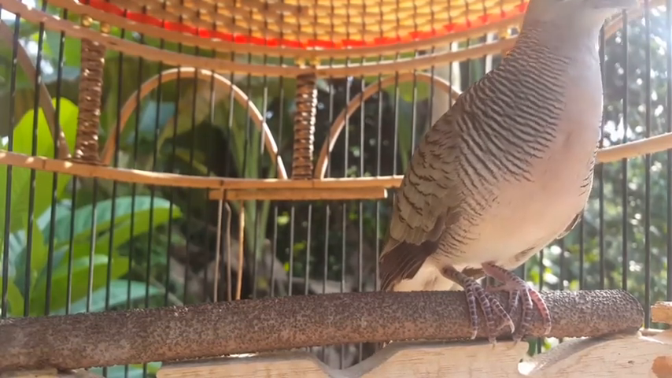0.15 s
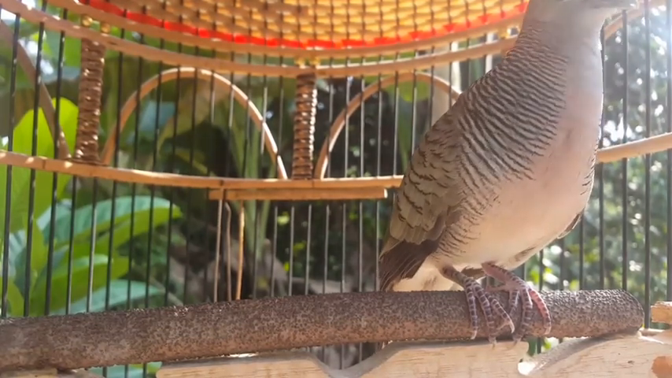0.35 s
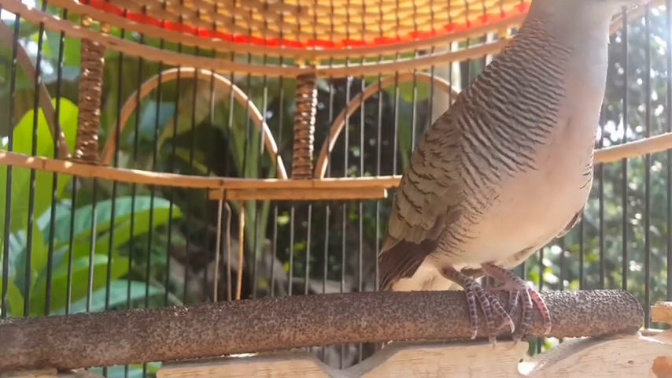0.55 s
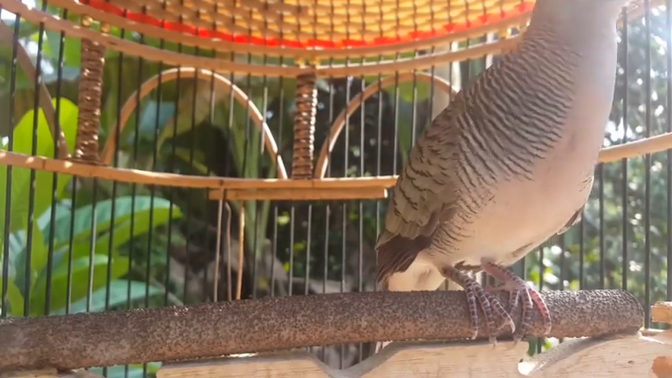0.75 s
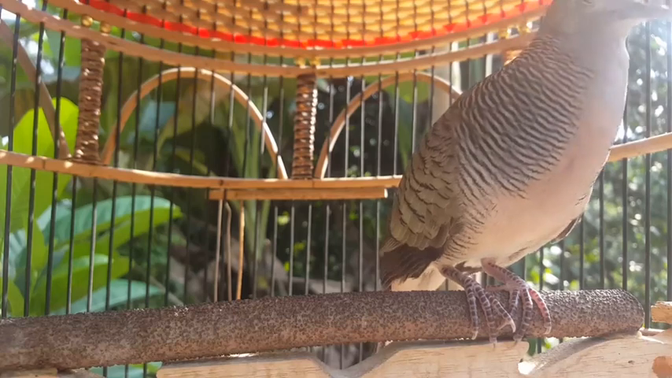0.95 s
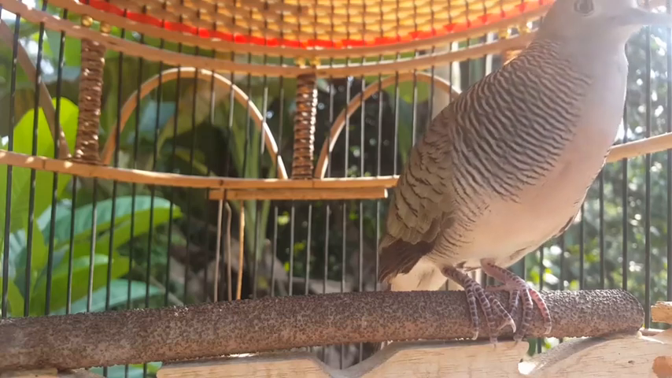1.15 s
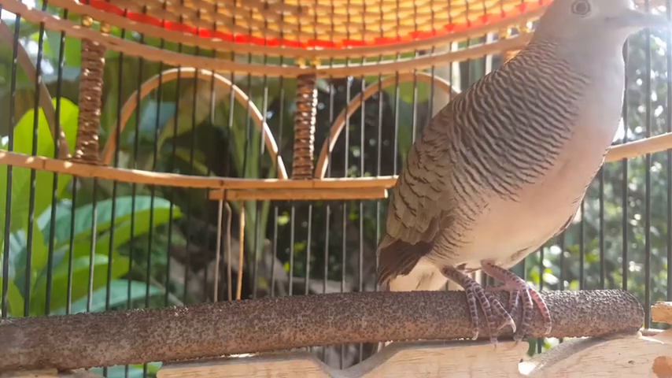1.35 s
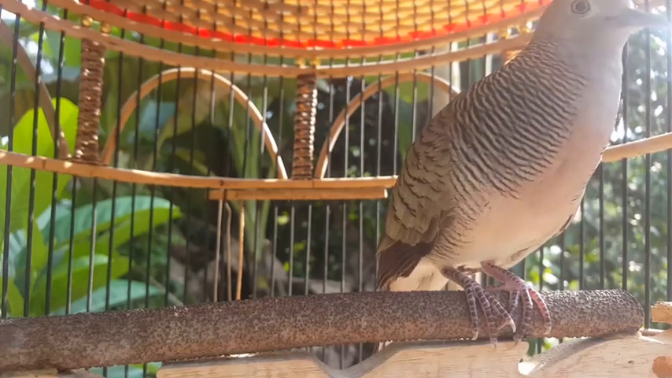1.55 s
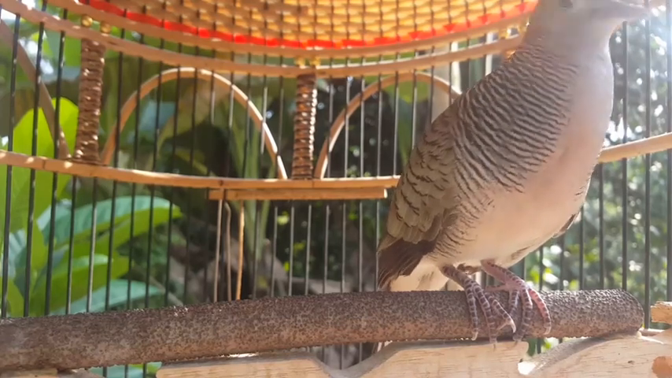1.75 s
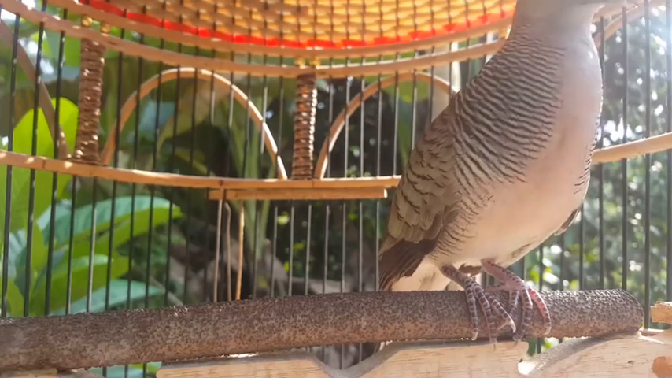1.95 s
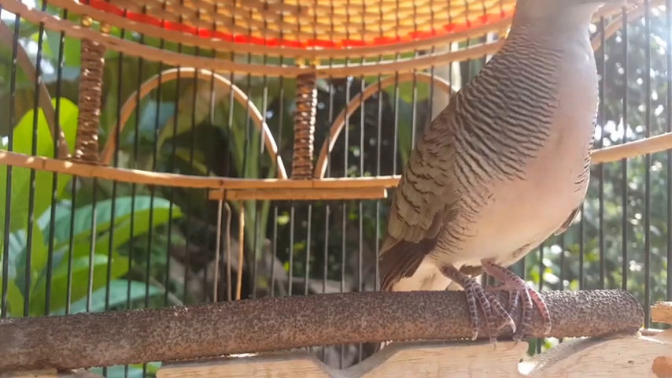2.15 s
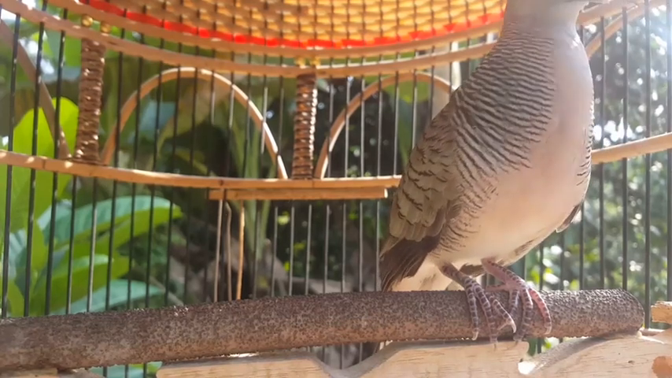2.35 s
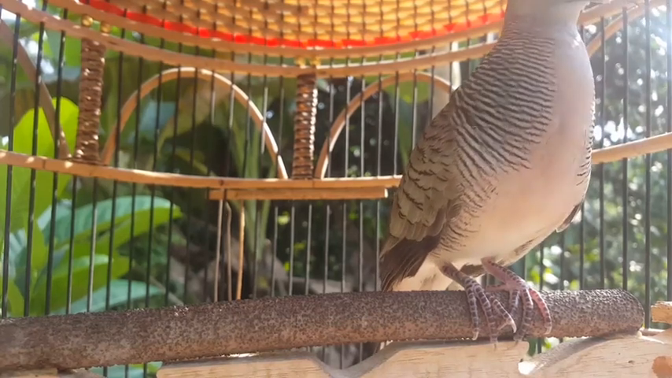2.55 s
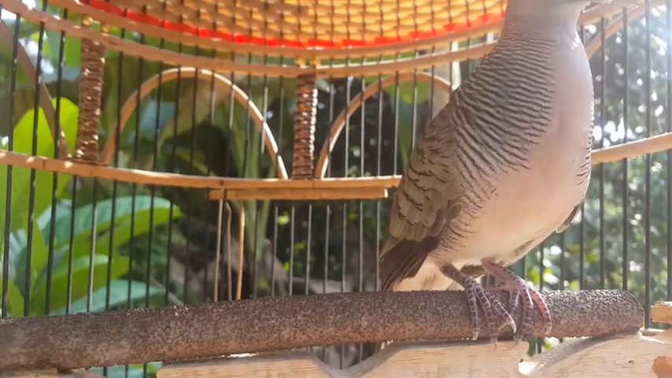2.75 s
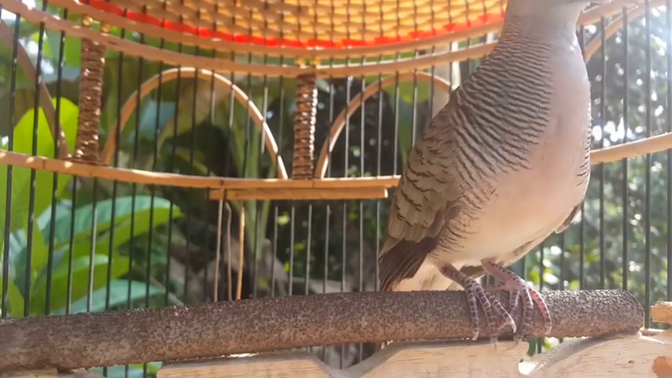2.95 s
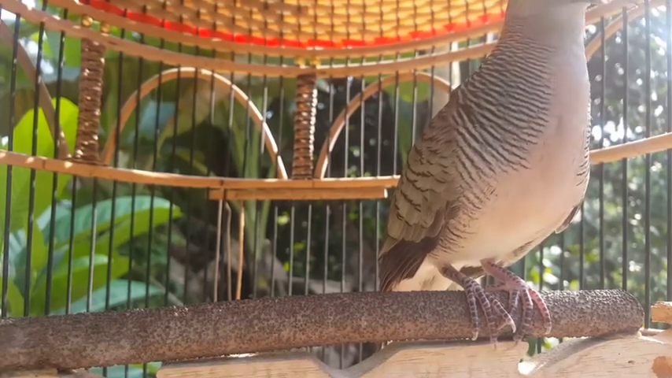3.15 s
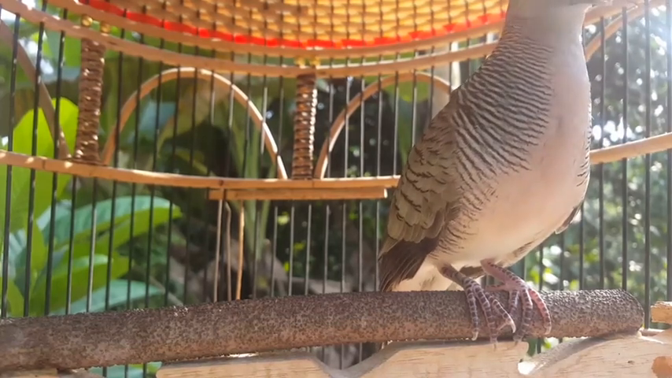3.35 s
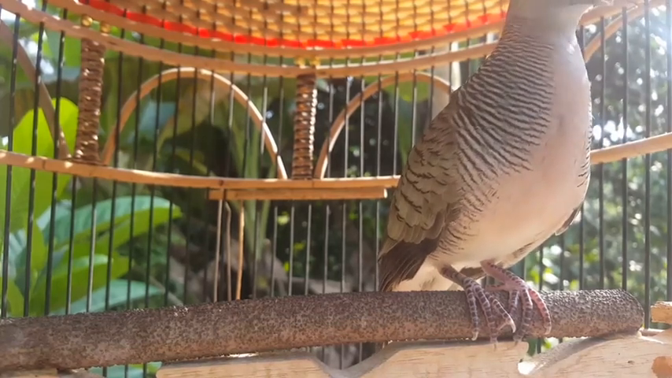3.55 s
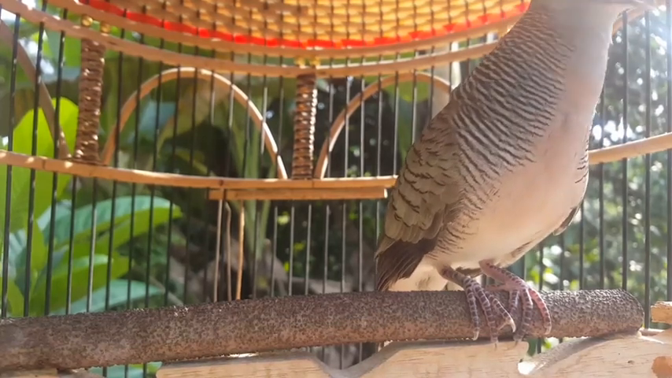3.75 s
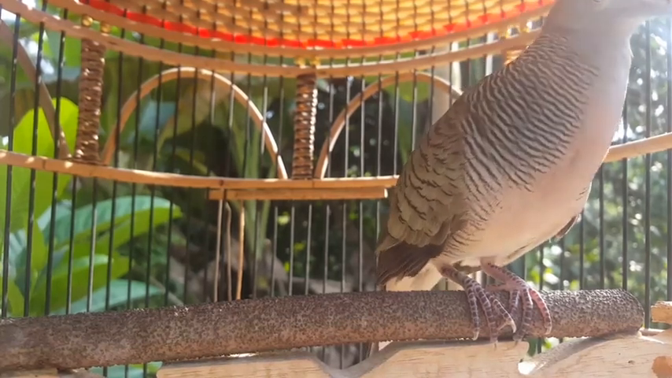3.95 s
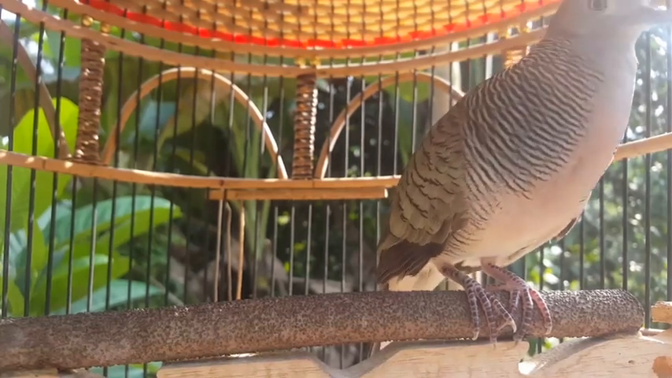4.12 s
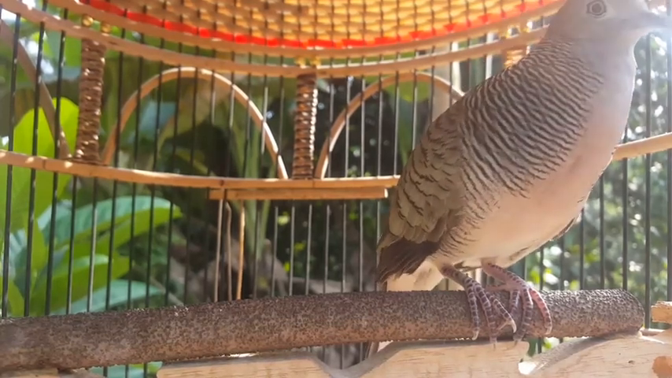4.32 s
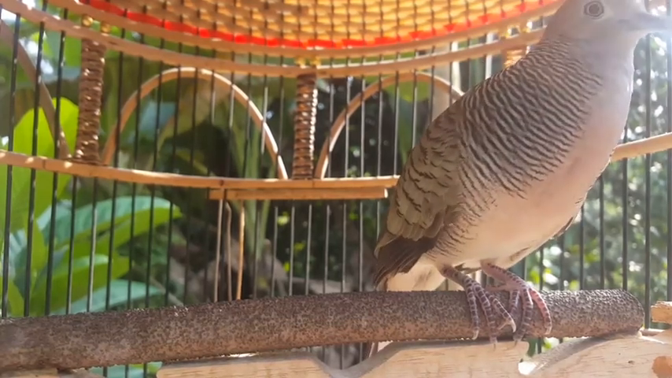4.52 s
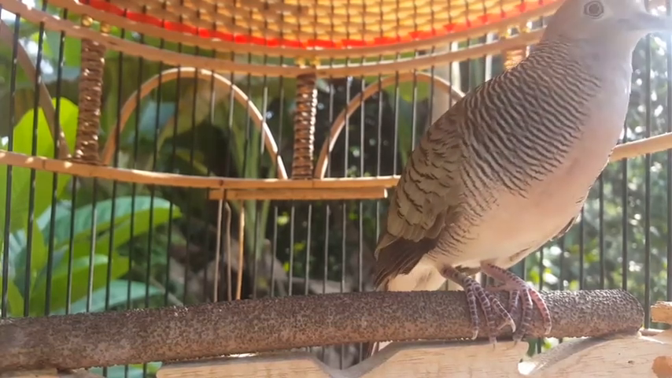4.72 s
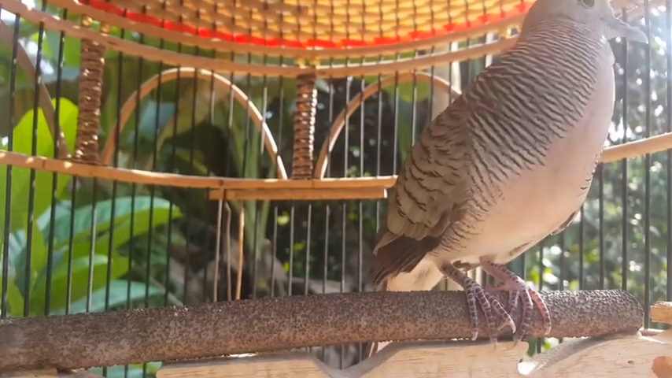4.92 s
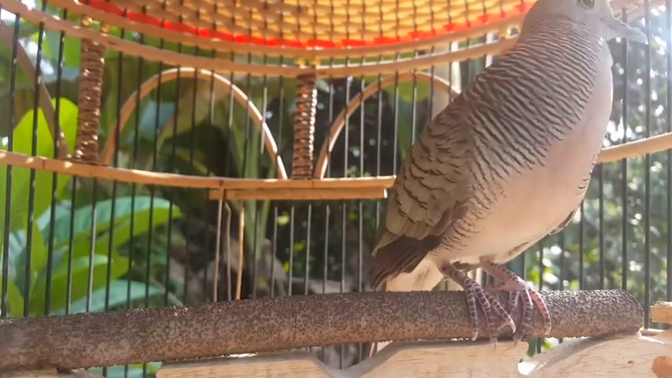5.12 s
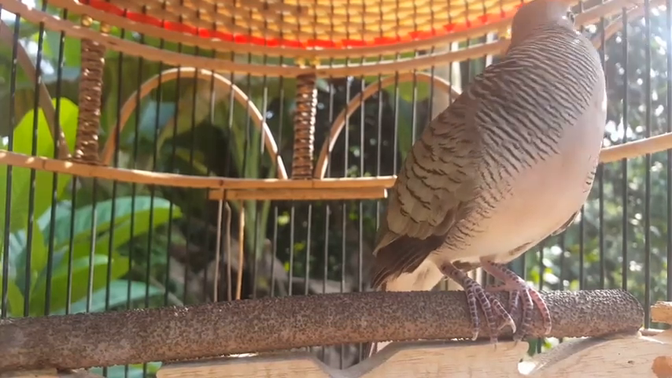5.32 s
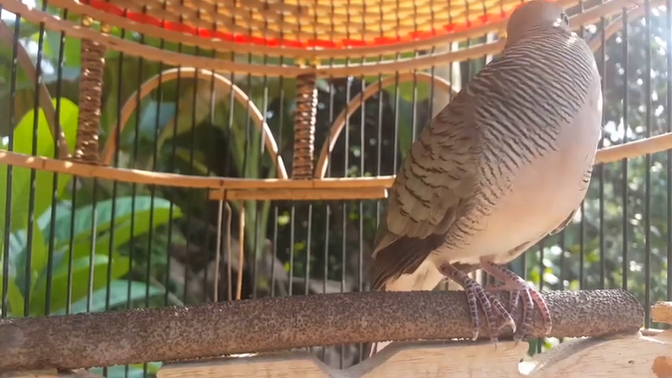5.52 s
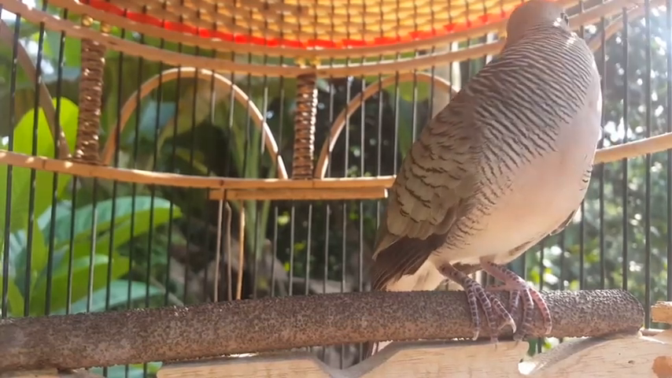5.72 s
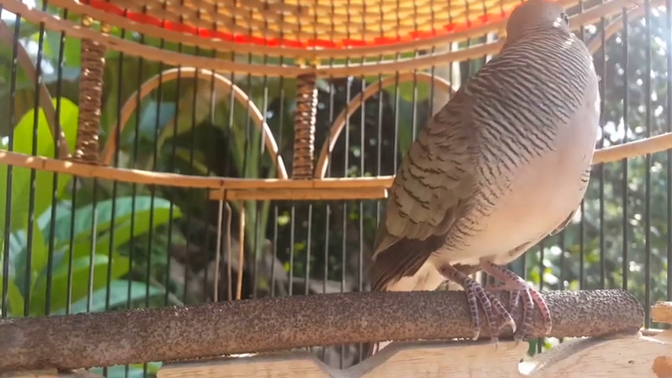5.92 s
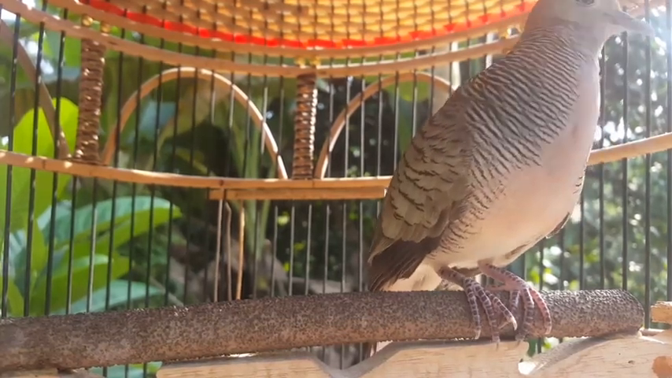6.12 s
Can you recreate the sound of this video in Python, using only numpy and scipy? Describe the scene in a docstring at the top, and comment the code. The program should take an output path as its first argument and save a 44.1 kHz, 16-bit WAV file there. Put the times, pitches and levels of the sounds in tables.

```python
"""From the start a single-cylinder engine idles, each firing a thud of exhaust, over outdoor hiss,
insect buzz and thin steady tones. At 0.9 s a caged zebra dove coos close by: a long arched note and
four short ones, most opening with a creak as the flaps of its syrinx speed up into a tone.
The engine's knocks, ticks and rumble swell and recede; at 4 s the dove calls again.
From 4.5 s far-off birds chatter while the engine grows duller."""
import sys
import numpy as np
from scipy import signal
from scipy.fft import rfft, irfft
from scipy.io import wavfile
from scipy.ndimage import uniform_filter1d, minimum_filter1d

SR = 44100
rng = np.random.default_rng(int(sys.argv[2]) if len(sys.argv) > 2 else 0)


def transcribe(signal):
    """Save signal, clipped to [-1, 1], as a 16-bit WAV file at the path in sys.argv[1]."""
    frames = np.atleast_2d(signal).T
    limited = np.clip(frames, -1, 1)
    pcm = np.round(limited * 32767).astype(np.int16)
    wavfile.write(sys.argv[1], SR, pcm)


N = 276948
TIME = np.arange(N) / SR
BIN_HZ = np.arange(N // 2 + 1) * SR / N

# The dove's two calls; break_s counts from the start of the note, high_s is time in the high voice:
# start_s, length_s, break_s, high_s, low_hz, high_hz, sag_hz, gain_db, creak_s, creak_db
DOVE_NOTES = [(0.884, .199, .037, .18, 826, 1166, 160, -4.7, .021, -9),
              (1.080, .044, .013, .05, 843, 1030, 40, -3, 0, -30),
              (1.148, .034, .008, .016, 825, 890, 25, -3, .008, -13.5),
              (1.222, .044, .016, .023, 840, 1005, 85, -2.7, .008, -15),
              (1.321, .076, .016, .052, 820, 1022, 45, -4, .008, -16.5),
              (3.990, .197, .036, .18, 828, 1167, 155, -4.5, .018, -10),
              (4.189, .044, .012, .05, 840, 1040, 75, -2, 0, -30),
              (4.257, .035, .013, .015, 835, 1010, 110, -3.3, .009, -13),
              (4.335, .048, .013, .05, 835, 1008, 90, -3, .008, -13),
              (4.447, .083, .016, .054, 832, 1038, 55, -4, .007, -14)]
# Harmonics of the coo: multiple, relative_db
COO_OVERTONES = [(2, -34), (3, -44.5), (5, -47.5), (6, -60)]
# Response of throat and cage: pitch_hz, gain_db, left_minus_right_db
THROAT_AND_CAGE = [(864, -5.5, -5.5), (884, -6, -10), (882, -2, -3.5), (990, -6, -8.5), (1050, -4.5, 3),
                   (970, 3.5, -4.5), (1080, 1.5, 3.5), (1100, 0.5, -10), (1104, -7, 0.5), (1129, -4.5, 9),
                   (1136, -3, -8.5), (1169, -4.5, 1)]
# Reflections from walls near the cage: delay_s, gain_db
NEAR_WALLS = [(.00699, -15), (.01789, -27)]

# Engine speed: time_s, firing_rate_hz
FIRING_RATE = [(0.0, 25.71), (0.3, 26.647), (0.6, 26.951), (1.0, 26.994), (1.5, 27.055), (2.0, 27.101),
               (2.4, 27.535), (2.7, 27.339), (3.0, 27.248), (3.4, 27.721), (3.8, 27.592), (4.3, 27.47),
               (4.8, 27.121), (5.3, 27.11), (5.8, 26.878), (6.28, 26.96)]
# Spectrum of one exhaust pulse: frequency_hz, relative_db
PULSE_SPECTRUM = [(15, -65.5), (55, -18), (82, -8.5), (108, 4.5), (160, 7.5), (192, -5.5), (220, -2.5),
                  (272, -1), (326, -8), (355, -10), (381, -13), (435, -13.5), (490, -17.5), (600, -20),
                  (660, -20.5), (1000, -30), (1500, -51), (3000, -75.5)]
# Low, middle and high bands of the exhaust: time_s, boom_db, thud_db, bark_db
EXHAUST_GAINS = [(0.0, -27, -27, -26.5), (0.03, -27.5, -25, -27), (0.82, -30, -24.5, -29),
                 (1.05, -25, -34.5, -32), (1.419, -30, -29.5, -31.5), (1.63, -27.5, -35.5, -34.5),
                 (1.8, -30.5, -28, -30.5), (2.31, -30, -27, -30.5), (2.74, -35, -33, -32),
                 (2.89, -30.5, -28.5, -35), (3.38, -27, -30, -34), (3.78, -26.5, -33.5, -33),
                 (4.51, -34, -35.5, -36.5), (4.86, -34.5, -29, -33.5), (5.32, -30, -38, -36),
                 (6.28, -31.5, -36.5, -38.5)]
# Drone of the silencer: time_s, gain_db
DRONE_GAIN = [(0.0, -43.5), (1.05, -62), (2.94, -42), (4.251, -48.5), (5.23, -51.5), (5.53, -47.5),
              (6.28, -57)]
# Walls that return the bark: delay_s, drift_s_per_s, relative_db
DRIFTING_PATHS = [(.00481, .00013, -13.6), (.0105, .000346, -16.6), (.016255, .000095, -6.8),
                  (.01967, -.000196, -14.7), (.03488, -.000598, -16)]
# Lift of the upper bark: time_s, gain_db
BARK_LIFT = [(0, 3), (.3, 2.5), (1.2, -0.5), (2.2, -0.5), (4.3, 1), (4.75, -1.5), (5.2, 0.5), (5.8, -1),
             (6.28, -1.5)]
# Hollow resonance of the exhaust: time_s, centre_hz, lift_db
HOLLOW_PATH = [(0.05, 136, 4), (.45, 102, 2), (.85, 105.1, 2.5), (1.1, 168.4, 4.5), (1.45, 165, -0.5),
               (1.7, 129, 0.5), (1.97, 137, 4.5), (2.3, 113, -0.5), (2.6, 155, 0.5), (3.0, 168.7, 2.5),
               (3.4, 163, 6.5), (3.75, 174.4, 1), (4.05, 133.7, 0), (4.4, 132.2, 6), (4.95, 136, -0.5),
               (5.4, 172.8, 5.5), (5.9, 165, 3)]
# Humming harmonics of the firing rate: peak_s, length_s, multiple, level_db
HUM_SWELLS = [(0.097, 0.42, 15, -43.5), (0.343, 0.44, 18, -42.5), (1.65, 1.1, 21, -49.5),
              (2.513, 0.29, 10, -41), (2.7, 1.1, 13, -46), (2.9, 1.3, 22, -52), (3.078, 0.44, 9, -41.5),
              (4.9, .7, 15, -47.5), (5.5, 1.4, 18, -52), (5.8, 0.81, 11, -49.5), (5.599, 0.71, 9, -46.5)]
# Gas rasp: frequency_hz, relative_density_db
RASP_SPECTRUM = [(150, 2), (400, 6.5), (700, 4.5), (950, 7), (1400, -1), (2100, -2.5), (3000, -9.5),
                 (4500, -14.5), (7000, -30)]
# Mechanical hiss: frequency_hz, relative_density_db
HISS_SPECTRUM = [(2500, -35.5), (5000, 1), (6300, 0.5), (8300, -5), (9500, -1.5), (11000, -12),
                 (15500, -14)]
# The engine's treble: time_s, rasp_gain_db, hiss_gain_db
TREBLE_GAINS = [(0.0, -53.5, -61), (0.14, -50, -58.5), (0.52, -50, -59.5), (0.62, -47, -57),
                (1.4, -53.5, -59), (2.28, -48.5, -54), (3.42, -51.5, -55), (3.64, -52.5, -60),
                (4.27, -54.5, -65.5), (4.78, -56, -64), (5.96, -60, -69.5), (6.2, -59.5, -70)]
# How far each firing stands out of the treble: time_s, burst_to_steady_ratio
BURST_DEPTH = [(0, 1), (.3, 1.7), (.75, 2.1), (1.3, 1.6), (2.1, 1.9), (2.8, 2.1), (3.5, 1.2), (4.2, 0.5),
               (6.28, 0.68)]
# Modes of the engine casing: frequency_hz, t60_s, relative_db
CASING_MODES = [(987, 0.03, -1.5), (1130, 0.021, -4), (1995, 0.017, -1), (2247, 0.018, -1.5),
                (3250, 0.012, -5)]
# Strength of the knocks: time_s, level_db
KNOCK_STRENGTH = [(0, -59), (.6, -51), (1.4, -53.5), (1.9, -54.5), (2.3, -42.5), (3.2, -47.5), (3.7, -52.5),
                  (4.3, -58), (6.28, -62)]
# Metallic ticks: start_s, relative_db
TICK_EVENTS = [(1.276, -34.5), (1.7204, -38), (1.8306, -37), (1.939, -34), (2.199, -38), (2.379, -47),
               (2.4162, -46), (2.5604, -45), (3.147, -42), (3.256, -34.5), (3.3658, -32), (3.4024, -38)]
# Their spectrum: frequency_hz, relative_density_db
TICK_SPECTRUM = [(3000, -21), (6500, 10.5), (9500, 9.5), (13000, -1.5), (15500, -8)]

# Far-off chatter: time_s, level_db
CHATTER_ENVELOPE = [(0, -76), (4.45, -76), (4.6, -58), (4.76, -50), (4.9, -59), (5.13, -49), (5.4, -60),
                    (5.75, -52), (5.9, -71), (6.28, -62)]
# Range of its chirps: pitch_hz, relative_db
CHIRP_RANGE = [(1500, -8), (1850, 2), (2400, 2), (3300, -3.5), (3700, -15.5)]
# Outdoor hiss: frequency_hz, relative_density_db
AIR_SPECTRUM = [(25, -8), (70, -10.5), (200, 13), (550, 14), (900, -7.5), (1350, -17), (2100, -9.5),
                (3200, -11), (4400, -11), (6000, -17.5), (9000, -30), (15000, -22.5)]
# Faint wavering bands in that hiss: centre_hz, level_db
HISS_PATCHES = [(1750, -64.5), (2150, -64.5), (2600, -71.5), (3150, -67)]
# Insect buzz: frequency_hz, relative_density_db
INSECT_SPECTRUM = [(4400, -42.5), (4650, -16.5), (4760, -3.5), (4860, 6), (4950, -5.5), (5060, -0.5),
                   (5200, -5), (5400, -28.5)]
# Thin steady tones: pitch_hz, level_db, left_minus_right_db
STEADY_TONES = [(1362, -62.5, -7), (1760, -73, -8), (2724, -71, 6), (5033, -67.5, 6), (6874, -85, -6)]
# Surrounding field at the two channels: frequency_hz, coherence, left_minus_right_db
SOUND_FIELD = [(130, 1, -1.5), (290, 1, 10.5), (700, 0.5, -3.5), (1320, 0, 0), (2370, 0.2, 4.5),
               (4400, 0.3, 10), (8100, 0, 10), (15000, .2, 4)]


def coo(start_s, length_s, break_s, high_s, low_hz, high_hz, sag_hz, gain_db):
    """Self-sustained oscillation: a nearly pure tone breaks upward, then sags as the air runs out."""
    attack_s, release_s, switch_s = .024, .022, .002
    onset_drop_hz, onset_s, low_rise_hz_per_s = 148, .002, 2500
    scoop_hz, scoop_s = 129, .0097
    quaver_hz, quaver_depth_hz, crest_s = 27.5, 32, .027
    age = np.arange(int(length_s * SR)) / SR
    held = np.maximum(age - break_s, 0)
    high = (np.tanh((age - break_s) / switch_s) - np.tanh((age - break_s - high_s) / switch_s)) / 2
    # A shorter note swells sooner, slides and quavers less, and is duller.
    reach = (length_s / max(note[1] for note in DOVE_NOTES)) ** .95
    spent = held / (length_s - break_s)
    sag = spent ** 2.6
    quaver = quaver_depth_hz * (reach * spent) ** 2 * np.cos(2 * np.pi * quaver_hz * (held - crest_s))
    scoop = scoop_hz * reach * np.exp(-held / scoop_s)
    low_voice = low_hz + low_rise_hz_per_s * age * (age < break_s + high_s / 2)
    high_voice = high_hz - scoop - sag_hz * sag + quaver
    onset = np.exp(-age / onset_s)  # the slide up out of the creak
    hz = low_voice - onset_drop_hz * onset + high * (high_voice - low_voice)

    jitter = .0025 * smooth_noise(len(age), 90)
    shimmer_db = 3.4 * smooth_noise((len(COO_OVERTONES), len(age)), 400)
    flutter = .08 * smooth_noise(len(age), 150)
    phase = 2 * np.pi * np.cumsum(hz * (1 + jitter)) / SR
    overtones = sum(amp(db + shimmer) * np.sin(round(multiple) * (phase + flutter))
                    for (multiple, db), shimmer in zip(COO_OVERTONES, shimmer_db))
    richness = amp(-14 * (1.5 - reach) - 9 * sag + 7 * (high - .5))
    onset_octave = amp(-7) * reach * onset * np.sin(2 * phase)
    voice = np.sqrt(2) * (np.sin(phase) + richness * overtones + onset_octave)

    attack = np.sin(np.pi / 2 * np.minimum(age / (attack_s * reach ** .5), 1))
    release = np.sin(np.pi / 2 * np.minimum((length_s - age) / release_s, 1))
    pitches, *columns = np.transpose(THROAT_AND_CAGE)
    carry_db, pan_db = (uniform_filter1d(np.interp(hz, pitches, c), size=220) for c in columns)
    out, at = np.zeros((2, N)), int(start_s * SR)
    out[:, at:at + len(age)] = voice * attack * release * amp(gain_db + carry_db) * pan(pan_db)
    return out


def creaks(slow_hz=255, fast_hz=520, throat_hz=980, ring_s=.001, overlap_s=.003, soft_db=9):
    """Impulse excitation: flaps of the syrinx ring the throat, quickening until they join the note."""
    out, age = np.zeros(N), np.arange(-SR // 200, SR // 200) / SR
    for note_s, *_, creak_s, creak_db in DOVE_NOTES:
        t, end = note_s - creak_s, note_s + overlap_s
        while t < end:
            progress = 1 - (end - t) / (creak_s + overlap_s)
            gap, detune, phase = rng.standard_normal(3)
            hz = throat_hz * (1 + .027 * progress + .12 * detune)
            flap = np.exp(-(age / ring_s) ** 2) * np.cos(2 * np.pi * hz * age + phase)
            flap_db = creak_db + .5 * (1.5 - progress) - soft_db * (1 - progress) ** 6
            at = int((t + age[0]) * SR)
            out[at:at + len(age)] += flap * amp(flap_db)
            t += np.exp(.14 * gap) / (slow_hz + (fast_hz - slow_hz) * progress ** 3)
    return out * pan(-3)


def cage_reflections(x, near_db=-26, near_t60_s=.16, far_db=-38, far_t60_s=.36):
    """Reverberation: early echoes, the ring of the cage and near walls, then a faint outdoor tail."""
    early = x + sum(amp(db) * np.roll(x, int(delay_s * SR), axis=1) for delay_s, db in NEAR_WALLS)
    age, response = np.arange(SR // 2) / SR, 0
    for db, t60_s in ((near_db, near_t60_s), (far_db, far_t60_s)):
        tail = rng.standard_normal((2, len(age))) * amp(-60 * age / t60_s) * (age > .004)
        response = response + amp(db) * tail / np.sqrt(np.sum(tail ** 2) / 2)
    return early + signal.oaconvolve(early, response, axes=1)[:, :N]


def engine(first_s=.00228):
    """Periodic excitation: each firing drives the exhaust, a rasp of gas, the mechanism and casing."""
    cycles = np.cumsum(curves(FIRING_RATE)[0]) / SR
    chance = rng.standard_normal((int(cycles[-1]) + 1, 3)).T
    slip_s, rasp_scatter_db, hiss_scatter_db = chance * [[.00008], [2], [4]]
    firings_s = np.interp(np.arange(len(slip_s)), cycles, TIME) + first_s + slip_s
    treble = rasp_and_hiss(firings_s, rasp_scatter_db, hiss_scatter_db)
    thumps = hollow_resonance(band_swells(exhaust(firings_s)))
    return thumps + hums(thumps, cycles) + treble + casing_knocks(firings_s) + metal_ticks()


def exhaust(firings_s, scatter_db=.96, drone_hz=537.8, drone_width_hz=8.9):
    """Source and filter: a pulse train sounds in three bands, and the silencer resonates as a drone."""
    sizes = amp(scatter_db * rng.standard_normal(len(firings_s)))
    pulses = rfft(impulses(firings_s, sizes)) * minimum_phase(PULSE_SPECTRUM)
    low, low_and_middle = lowpass(122), lowpass(200)
    boom, thud, bark = irfft(pulses * np.array([low, low_and_middle - low, 1 - low_and_middle]), N)
    drone = irfft(pulses / (1 + 1j * (BIN_HZ - drone_hz) / drone_width_hz) ** 2, N)
    parts = unit(boom), unit(thud), unit(yard_reflections(bark)), unit(drone) * amp(1)
    return sum(part * amp(db) for part, db in zip(parts, curves(EXHAUST_GAINS) + curves(DRONE_GAIN)))


def yard_reflections(x, dull_hz=650, yard_db=-5.5, yard_t60_s=.35):
    """Interference: drifting echoes make overtones swell and fade; reverberation fills the gaps."""
    dull = irfft(rfft(x) * lowpass(dull_hz, order=6), N)
    age = np.arange(SR // 3) / SR
    tail = rng.standard_normal(len(age)) * amp(-60 * age / yard_t60_s) * (age > .008)
    yard = signal.oaconvolve(dull, tail / np.sqrt(np.sum(tail ** 2)))[:N]
    echoes = sum(amp(db + 1) * np.interp(TIME - delay_s - drift * TIME, TIME, dull)
                 for delay_s, drift, db in DRIFTING_PATHS)
    return x + yard * amp(yard_db) + echoes


def band_swells(x, rumble_hz=88, bright_hz=340, peak_s=2.7, width_s=.65, lift_db=7):
    """Shelving filters: the deepest rumble swells once, and the upper bark comes and goes."""
    rumble, upper = irfft(rfft(x) * np.array([lowpass(rumble_hz), 1 - lowpass(bright_hz)]), N)
    rumble_db = lift_db * np.exp(-((TIME - peak_s) / width_s) ** 4)
    return x + rumble * (amp(rumble_db) - 1) + upper * (amp(curves(BARK_LIFT)[0]) - 1)


def hollow_resonance(x, width_hz=17):
    """Resonance: a wandering peak lifts the partials near its centre and lowers their neighbours."""
    centre_hz, lift_db = curves(HOLLOW_PATH)
    firing_hz = np.mean(FIRING_RATE, axis=0)[1]
    spectrum, out = rfft(x), x
    for hz in firing_hz * np.arange(4, 8):
        partial = irfft(spectrum * np.maximum(1 - np.abs(BIN_HZ - hz) / firing_hz, 0), N)
        nearness = np.exp(-((hz - centre_hz) / width_hz) ** 2)
        out = out + partial * (amp(lift_db * (2 * nearness - 1)) - 1)
    return out


def hums(thumps, cycles):
    """Constructive interference: single harmonics hum for a while, in phase with the exhaust."""
    out = 0
    for peak_s, length_s, multiple, db in HUM_SWELLS:
        swell = np.exp(-(2 * (TIME - peak_s) / length_s) ** 2)
        tone = np.exp(2j * np.pi * round(multiple) * cycles)
        in_phase = np.exp(1j * np.angle(np.sum(thumps * swell / tone)))
        out = out + np.sqrt(2) * np.real(tone * in_phase) * swell * amp(db)
    return out


def rasp_and_hiss(firings_s, rasp_scatter_db, hiss_scatter_db, late_s=.00077, puff_s=.0006, tick_s=.0013):
    """Amplitude-modulated noise: just after each firing the gas puffs and the mechanism ticks."""
    latest = np.maximum(np.searchsorted(firings_s + late_s, TIME) - 1, 0)
    age = np.abs(TIME - firings_s[latest] - late_s)
    depth = curves(BURST_DEPTH)[0]
    puff = depth * amp(rasp_scatter_db[latest]) * age / puff_s * np.exp(1 - age / puff_s)
    tick = .75 * depth * amp(hiss_scatter_db[latest]) * age / tick_s * np.exp(1 - age / tick_s)
    rasp_db, hiss_db = curves(TREBLE_GAINS)
    rasp = field_noise(RASP_SPECTRUM) * unit(1 + puff) * amp(rasp_db + 12)
    hiss = field_noise(HISS_SPECTRUM) * unit(1 + tick) * amp(hiss_db + 1.5)
    return rasp + hiss


def casing_knocks(firings_s, late_s=.001966, slip_s=.00035, scatter_db=3):
    """Modal vibration: a blow follows each firing and excites its own mix of the casing's modes."""
    age, out = np.arange(SR // 20) / SR, 0
    for hz, t60_s, db in CASING_MODES:
        slip, size = rng.standard_normal((len(firings_s), 2)).T
        blows = impulses(firings_s + late_s + slip_s * slip, amp(db + scatter_db * size))
        mode = amp(-60 * age / t60_s) * np.sin(2 * np.pi * hz * age)
        out = out + signal.oaconvolve(blows, mode)[:N]
    return unit(out) * pan(3) * amp(curves(KNOCK_STRENGTH)[0])


def metal_ticks(t60_s=.013):
    """Exponential decay: thin, irregular ticks of metal die away as bursts of bright noise."""
    times_s, db = np.transpose(TICK_EVENTS)
    decay = amp(-60 * np.arange(SR // 20) / SR / t60_s)
    envelope = signal.oaconvolve(impulses(times_s, amp(db - 5)), decay)[:N]
    return field_noise(TICK_SPECTRUM) * envelope


def far_birds(count=800, length_s=.007, glide_hz_per_s=15000, scatter_db=2, garden_t60_s=.11):
    """Superposition: many short chirps merge into chatter, blurred by the garden's reverberation."""
    chirps, age = np.zeros(N + SR // 10), np.arange(-SR // 20, SR // 20) / SR
    pitches, colour_db = np.transpose(CHIRP_RANGE)
    for when, height, slope, size in rng.random((count, 4)):
        hz = pitches[0] + height * (pitches[-1] - pitches[0])
        phase = 2 * np.pi * (hz + glide_hz_per_s * (slope - .5) * age) * age
        gain = amp(np.interp(hz, pitches, colour_db) + scatter_db * (2 * size - 1))
        at = int(when * N)
        chirps[at:at + len(age)] += gain * np.exp(-(2 * age / length_s) ** 2) * np.sin(phase)
    tail_age = np.arange(SR // 4) / SR
    tails = rng.standard_normal((2, len(tail_age))) * amp(-60 * tail_age / garden_t60_s)
    chatter = np.array([signal.oaconvolve(chirps, tail)[:N] for tail in tails])
    return unit(chatter) * amp(curves(CHATTER_ENVELOPE)[0]) * pan(2)


def outdoors(air_db=-48, insect_db=-58):
    """Random modulation: thin tones, patches of hiss, broad hiss and insect buzz waver in level."""
    tones = sum(np.sqrt(2) * np.sin(2 * np.pi * hz * TIME) * amp(db + 1.3 * wander(4.7)) * pan(pan_db)
                for hz, db, pan_db in STEADY_TONES)
    patches = sum(field_noise([(hz / 1.4, -40), (hz, 0), (hz * 2, -40)]) * amp(db + 4 * wander(19))
                  for hz, db in HISS_PATCHES)
    air = field_noise(AIR_SPECTRUM) * amp(air_db + 2.3 * wander(2.4))
    insects = field_noise(INSECT_SPECTRUM) * amp(insect_db + .55 * wander(26))
    return air + insects + patches + tones


def field_noise(colour):
    """Partial coherence: noise alike in both channels in the bass, diffuse and leftward in the treble."""
    coherence, lean_db = spectra(SOUND_FIELD)
    coherence = np.clip(coherence, 0, 1)
    mid, side = rfft(rng.standard_normal((2, N)))
    pair = mid * np.sqrt(1 + coherence) + side * np.sqrt(1 - coherence) * np.array([[1], [-1]])
    out = irfft(pair * pan(lean_db) * amp(spectra(colour)[0]), N)
    return out / np.std(out.mean(axis=0))


def minimum_phase(colour):
    """Causality: the frequency response of a pulse with a sharp front, then a ring."""
    cepstrum = irfft(np.log(amp(spectra(colour)[0])), N)
    return np.exp(rfft(cepstrum * (1 + np.sign(N / 2 - np.arange(N))) * (TIME > 0)))


def lowpass(cutoff_hz, order=12):
    """Zero-phase low-pass gain for every bin."""
    return 1 / (1 + (BIN_HZ / cutoff_hz) ** order)


def impulses(times_s, sizes):
    """Impulse train: one sample at each time."""
    return np.bincount(np.clip(times_s * SR, 0, N - 1).astype(int), sizes, N)


def smooth_noise(shape, samples):
    """Moving average of white noise, with an rms of 1."""
    return unit(uniform_filter1d(rng.standard_normal(shape), size=samples))


def wander(rate_hz):
    """Linear interpolation between random values, with an rms of 1."""
    step = max(int(SR / rate_hz), 1)
    return unit(uniform_filter1d(np.repeat(rng.standard_normal(N // step + 1), step), step)[:N])


def curves(rows):
    """Interpolation of each column over time."""
    times_s, *columns = np.transpose(rows)
    return [np.interp(TIME, times_s, c) for c in columns]


def spectra(rows):
    """Interpolation of each column over log frequency."""
    hz, *columns = np.transpose(rows)
    return [np.interp(np.log(BIN_HZ + 1), np.log(hz), c) for c in columns]


def pan(db):
    """Level difference, left minus right, as two gains."""
    return amp(np.array([[.5], [-.5]]) * db)


def amp(db):
    """Decibels as an amplitude ratio."""
    return 10 ** (np.asarray(db) / 20)


def unit(x):
    """Normalisation to an rms of 1."""
    return x / np.sqrt(np.mean(x ** 2) + 1e-18)


def scene():
    """Superposition: the dove in front, the engine and the garden behind."""
    dove = sum(coo(*note[:-2]) for note in DOVE_NOTES) + creaks()
    return cage_reflections(dove) + engine() + outdoors() + far_birds()


def record(dry, ceiling=.86, hold_s=.07, top_hz=15400):
    """Peak limiting holds the coos down and ducks the background with them; a low-pass cuts the top."""
    hold = int(hold_s * SR)
    gain = ceiling / np.maximum(np.abs(dry).max(axis=0), ceiling)
    held_gain = minimum_filter1d(gain, hold, origin=(hold - 1) // 2)
    limited = dry * uniform_filter1d(held_gain, size=220)
    return signal.sosfilt(signal.ellip(10, .1, 80, top_hz, fs=SR, output="sos"), limited)


dry = scene()
out = record(dry)
transcribe(out)
```